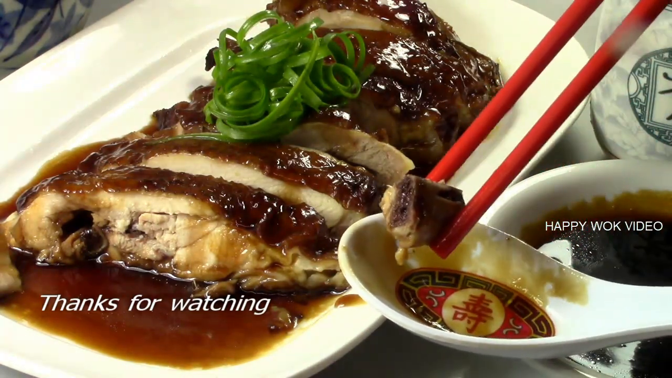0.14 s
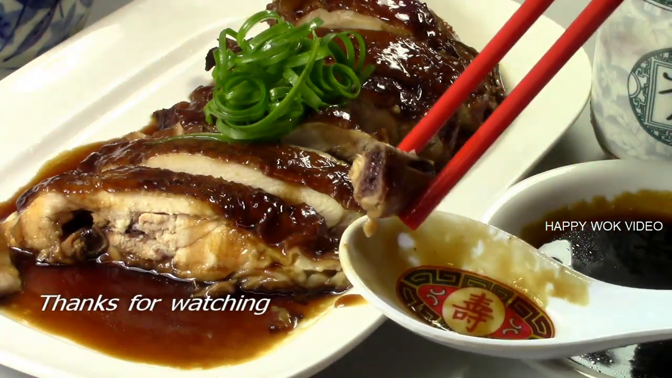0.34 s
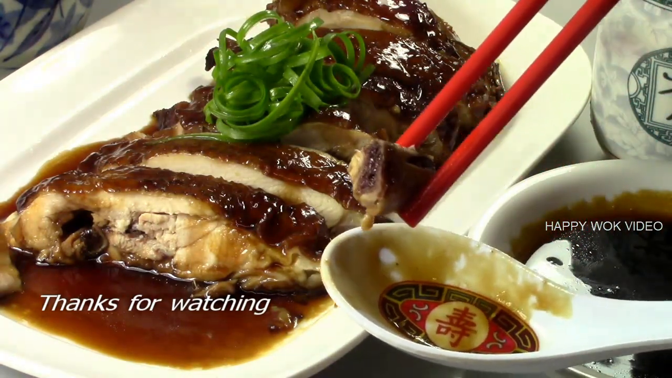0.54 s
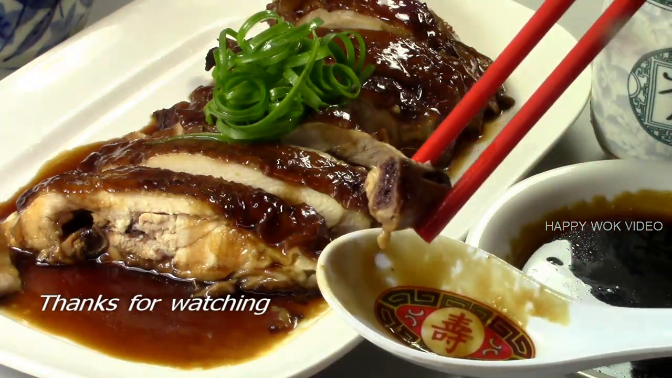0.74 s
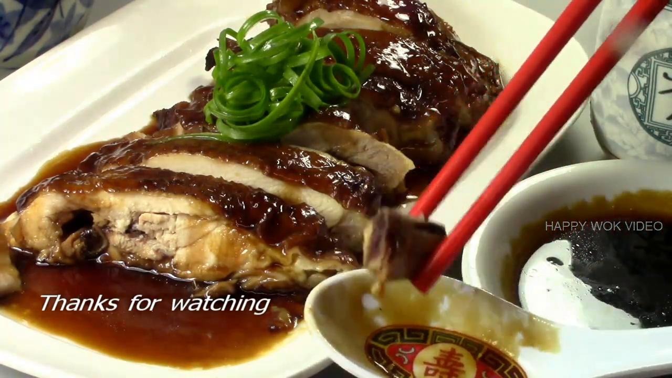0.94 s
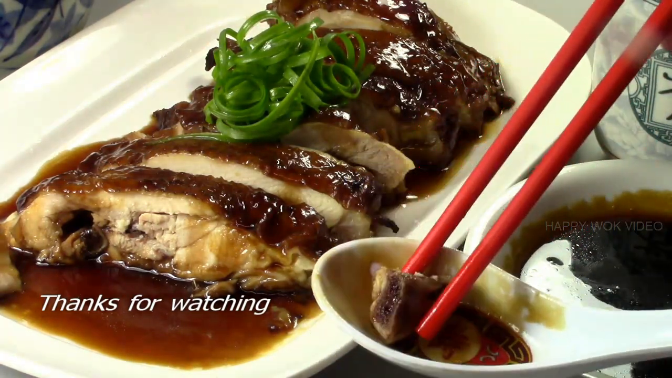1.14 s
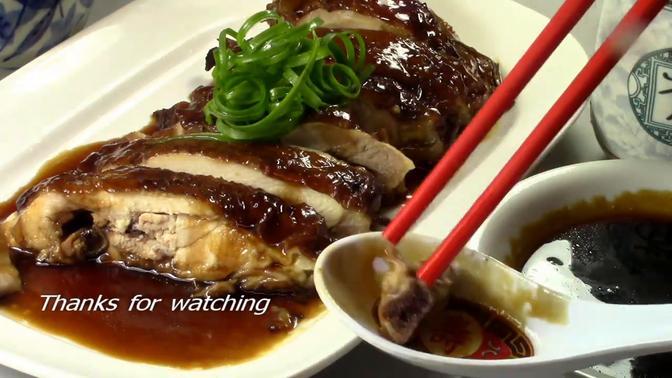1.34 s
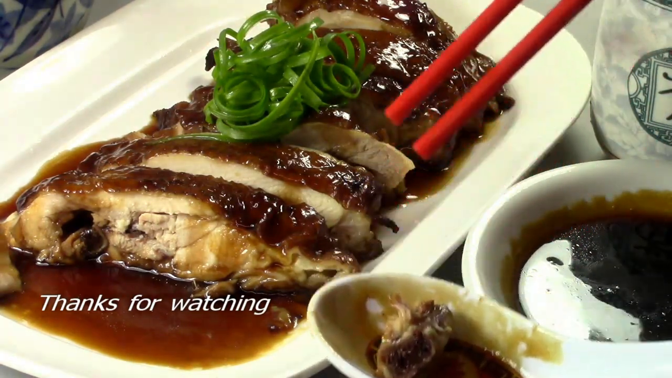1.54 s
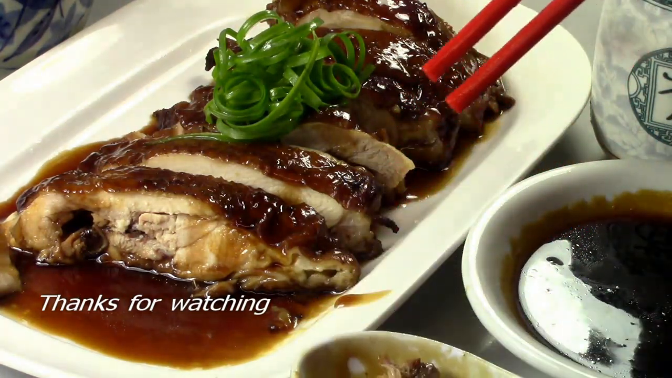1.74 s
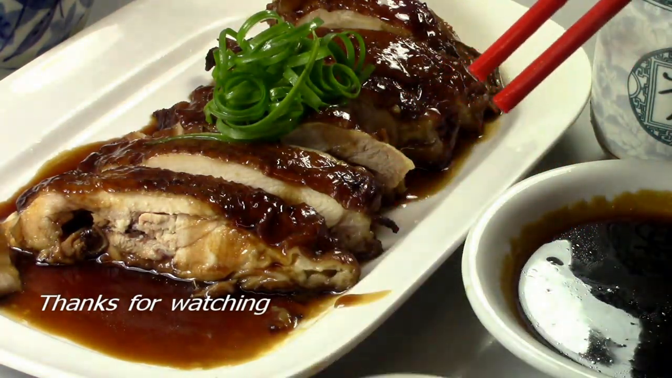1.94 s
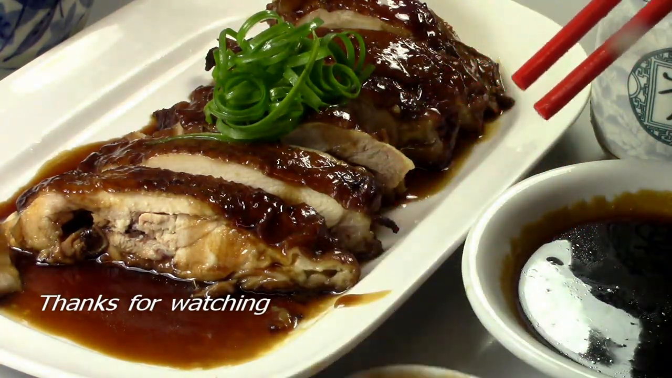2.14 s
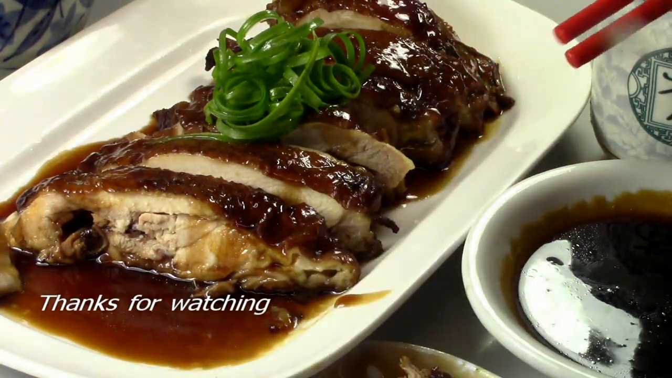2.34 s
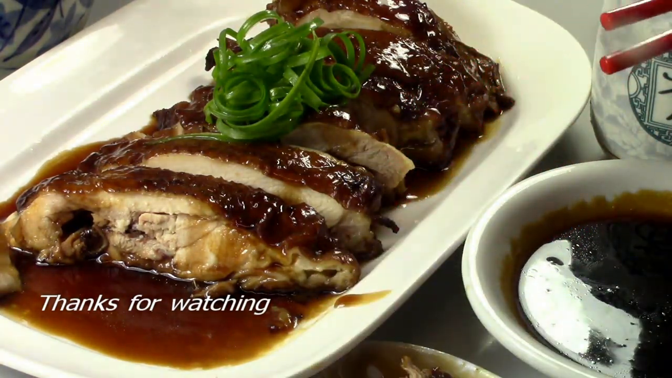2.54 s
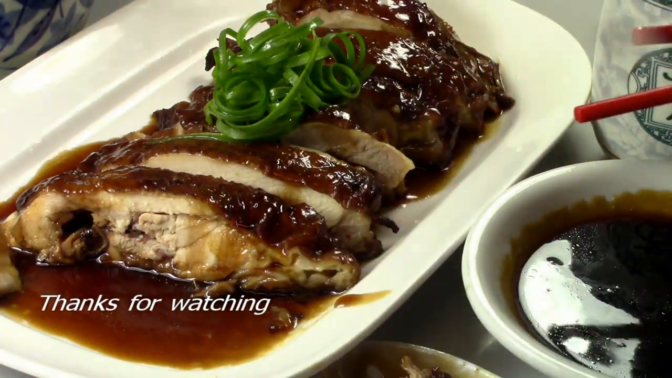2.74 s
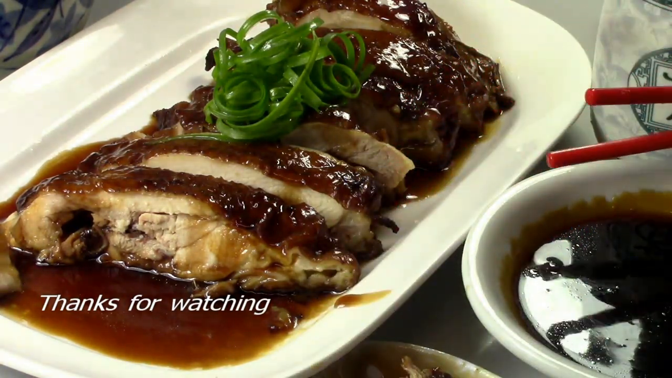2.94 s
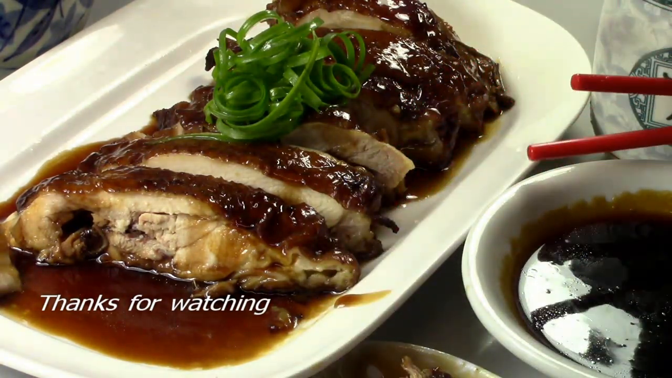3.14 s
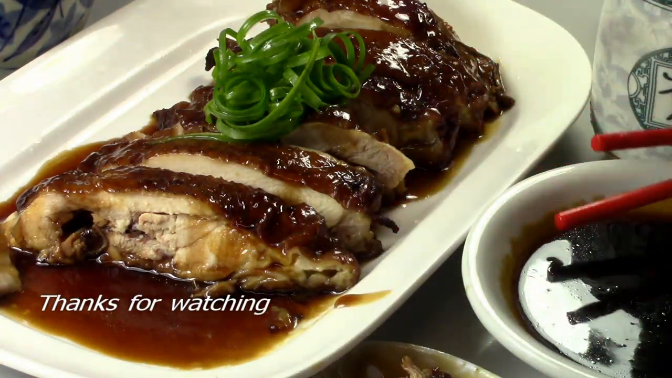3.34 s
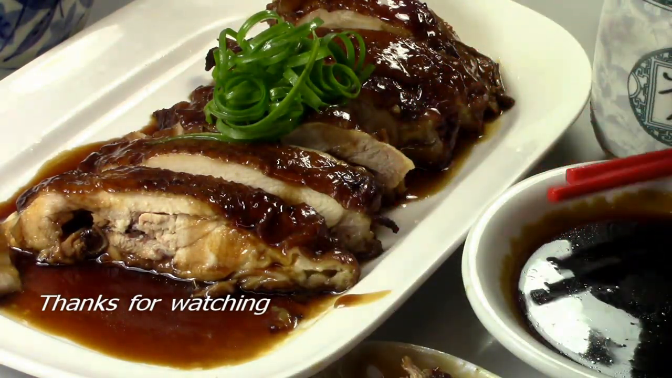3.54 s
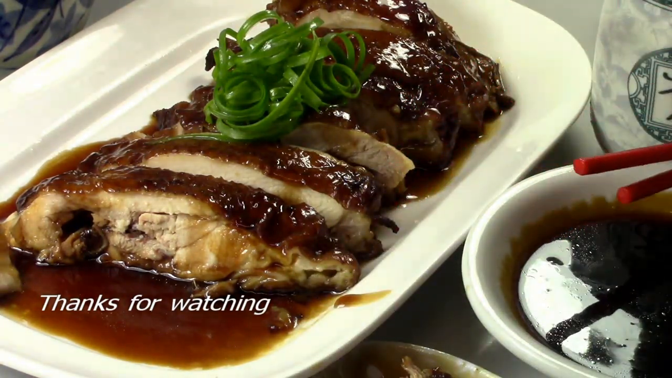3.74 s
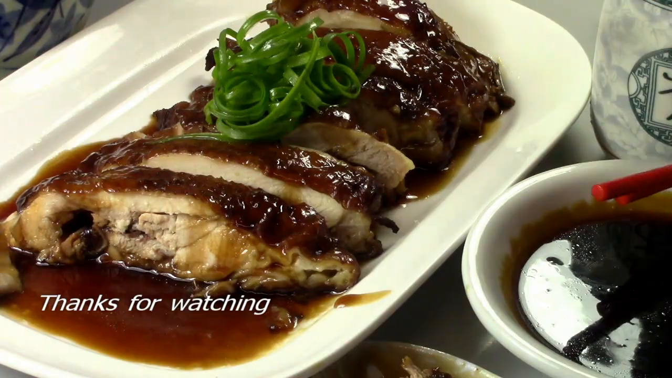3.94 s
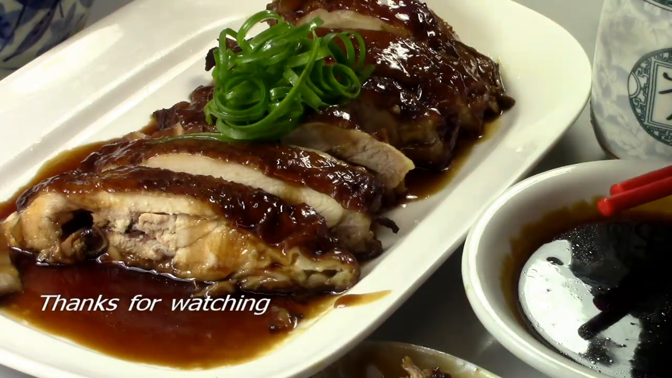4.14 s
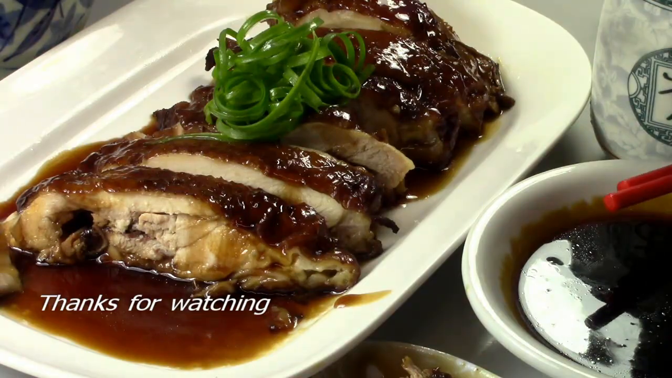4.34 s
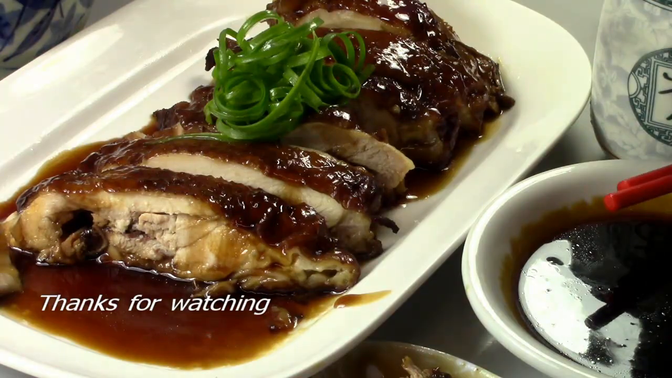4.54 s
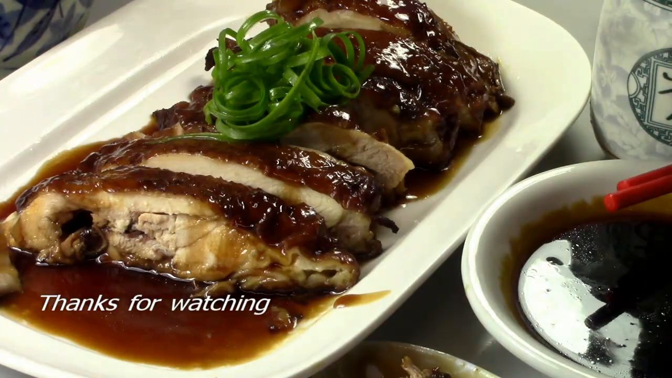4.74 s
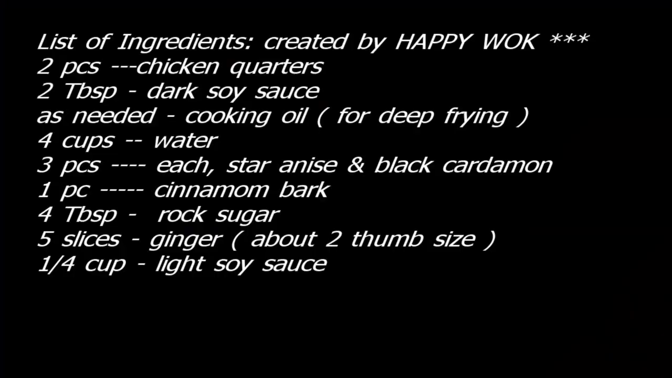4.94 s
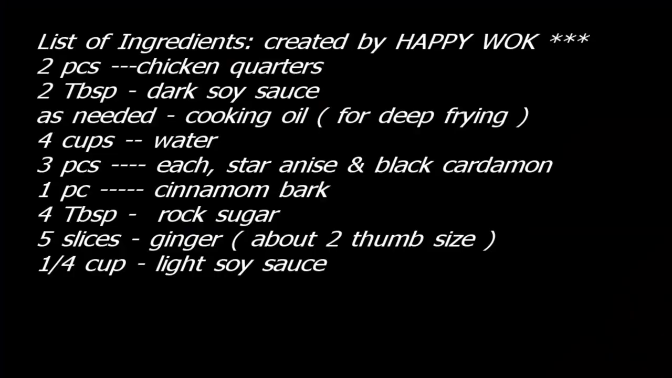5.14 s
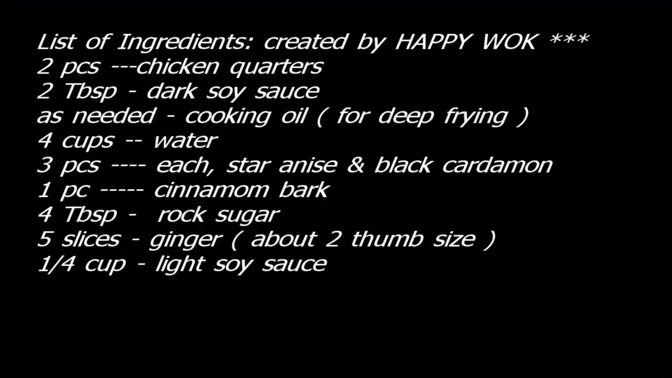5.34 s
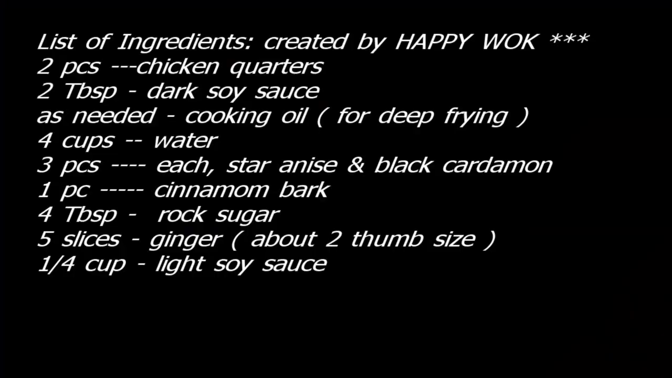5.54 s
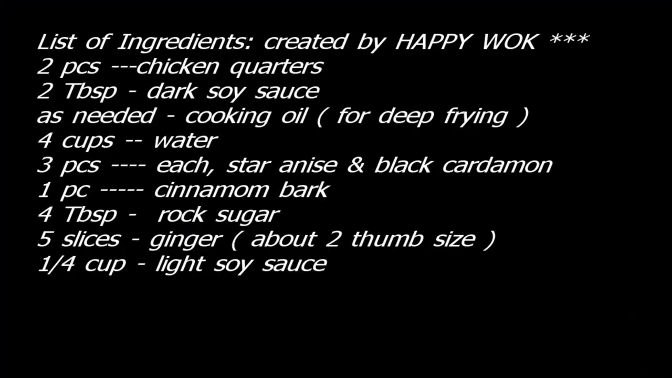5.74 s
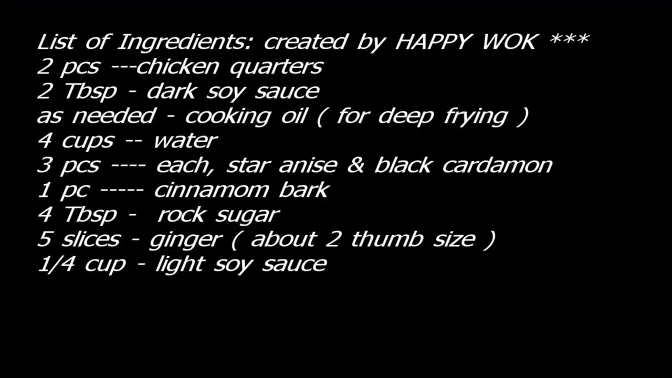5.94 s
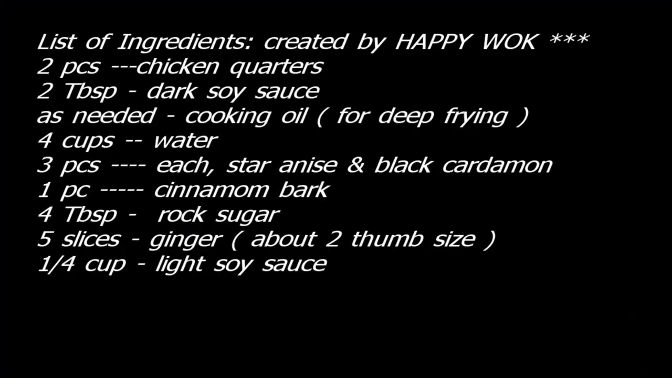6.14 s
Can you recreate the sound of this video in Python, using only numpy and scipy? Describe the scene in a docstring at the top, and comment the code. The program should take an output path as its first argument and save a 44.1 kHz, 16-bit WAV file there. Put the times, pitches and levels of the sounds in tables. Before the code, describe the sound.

Quiet small room with low, dull background noise, close stereo microphone. A china spoon slides faintly over the table in short scuffs, followed by a bright clack and a solid dull knock as it is set down. More knocks follow, then a quick cluster of ringing china rattles and tiny scrapes, another tight clatter, a dry rub right at the microphone, and an abrupt cut to near silence.

```python
"""Chopsticks, china and a sliding spoon

Chopsticks pick food off a platter in a small, quiet room; a china spoon slides over the table and is set down.
Clacks, touches on a sauce bowl and rattles on the spoon are noise bursts that knock through the table,
with decaying sines for the ring. Streams of tiny clicks make the slides, scrapes and a faint breath-like hiss.
Something rubs close to the microphone over faint filtered room noise, then the input is switched off."""
import sys
import numpy as np
from scipy import signal
from scipy.fft import rfft, irfft, next_fast_len
from scipy.io import wavfile
from scipy.ndimage import map_coordinates

SR = 44100
rng = np.random.default_rng(int(sys.argv[2]) if len(sys.argv) > 2 else 0)


def output_pcm(signal):
    """Save a mono or channel-first signal as 16-bit PCM at the path in sys.argv[1].

    Samples are clipped to [-1, 1] before scaling.
    """
    pcm = np.clip(np.atleast_2d(signal).T, -1, 1) * 32767
    wavfile.write(sys.argv[1], SR, np.round(pcm).astype(np.int16))


N = 276933
TIME = np.arange(N) / SR  # s

# contacts on the china spoon: start_s [s], relative knock_db [dB], hardness [treble slope, dB/octave],
# relative ring_db [dB]
SPOON_CONTACTS = [(1.5205, 11, -12, -33.5), (2.3392, 9, -4, -30), (3.4915, 11, 0.5, -18),
                  (3.6755, 13.5, 0.5, -4.5), (3.7598, 10, -1.5, -8), (3.8238, 15.5, 0.5, -9),
                  (3.832, 3, -0.5, -29), (3.845, 8, -1.5, -10.5), (4.208, -2, -6, -37),
                  (4.2197, 17, 1.2, -5.5), (4.2353, 13.5, -2, -7), (4.2492, 15, -3, -19)]
# contacts on the sauce bowl: start_s [s], relative knock_db [dB], hardness [dB/octave], relative ring_db [dB]
BOWL_CONTACTS = [(3.1705, 2, -1.5, -23.5), (3.622, 0, 2.5, -29), (3.6295, 2, 0.5, -21.5),
                 (3.708, 7.5, -2, -25.5), (3.799, 5, 0.5, -33.5), (4.376, -40, -4, -47),
                 (4.411, -13, -2, -54)]
# short bright clacks, the two loud ones likely a touch on the platter, the faint ones sticks:
# start_s [s], relative knock_db [dB], hardness [dB/octave], relative ring_db [dB]
CLACKS = [(1.8405, 10.5, -3, -16), (2.027, -9.5, -6.5, -43.5), (2.04, -17, -3, -44), (2.4485, 9, -5, -15.5),
          (2.8505, -10.5, 3.5, -41), (2.8585, -19, 5, -60)]
# damped knocks without ring, the loudest perhaps the spoon set down on the table:
# start_s [s], relative knock_db [dB], hardness [dB/octave]
DULL_KNOCKS = [(2.1968, 19.5, -5), (2.465, 12, -24), (3.729, 6.5, 2)]
# small dry ticks of the chopstick tips: start_s [s], relative knock_db [dB], hardness [dB/octave]
TIP_TICKS = [(1.2385, -11.5, 0.5), (3.07, -34.5, 8.5)]

# colour of each kind of knock: pitch_hz [Hz], level_db [dB]
SPOON_KNOCK_COLOUR = [(400, 0), (1400, -2.5), (3400, 0.5), (6300, -0.5), (9600, -9.5)]
BOWL_KNOCK_COLOUR = [(400, 3.5), (1400, -13), (3400, -1.5), (6300, 5), (9600, -5.5)]
CLACK_COLOUR = [(400, -1.5), (1400, -6), (3400, -13.5), (6300, 1), (9600, -7.5)]
DULL_KNOCK_COLOUR = [(400, -6.5), (1400, -1.5), (3400, 6.5), (6300, -5), (9600, -2.5)]
TIP_KNOCK_COLOUR = [(400, -8), (1400, 1), (3400, 2), (6300, 7.5), (9600, -8)]
# a sharp contact carries little bass: pitch_hz [Hz], level_db [dB]
CONTACT_BASS_LOSS = [(40, -17), (110, -10.5), (230, -3.5), (390, 2.5), (700, -3), (1300, 0), (11000, -2)]
# the treble slope of a contact runs between these two pitches; the second is also the top of the sound
SOFTEN_ABOVE_HZ, CUTOFF_HZ = 1580, 10950

# resonances of the table with the dishes on it: pitch_hz [Hz], width_hz [Hz], level_db [dB]
TABLE_RESONANCES = [(400, 24, -2), (447, 20, -10), (974, 13, -14), (1253, 140, -4), (1515, 280, -4.5),
                    (1800, 13, -7.5), (2250, 68, 2)]
# ringing modes of the spoon, the bowl and the clacks: pitch_hz [Hz], level_db [dB], t60_s [s]
SPOON_MODES = [(2240, -24, 0.18), (4280, -16.5, 0.073), (4797, -13, 0.14), (4840, -6.5, 0.15),
               (4866, -1.5, 0.04), (5082, -18.5, 0.2), (6180, -12, .07), (7734, -6.5, .06),
               (8160, -3.5, 0.079), (8224, -2, .04), (9120, -8, 0.021), (10385, -25, .07)]
BOWL_MODES = [(3284, -6, 0.31), (3290, -0.5, .09), (5253, -16.5, .08), (6100, -23.5, .25), (8656, -8, .28),
              (9210, 7, 0.033), (10400, -15, 0.081)]
CLACK_MODES = [(2814, -3.5, 0.061), (2920, -0.5, 0.031), (2950, -20, 0.07), (3573, -7, 0.083),
               (5885, -7.5, 0.031), (7450, 2.5, 0.025), (8600, -7, 0.044), (9520, -6.5, 0.034)]

# pushes that slide the spoon over the table; the one at 3.986 is a brighter scuff of a tip:
# start_s at full grip [s], length_s [s], level_db [dB], spoon ring relative to the push, ring_db [dB]
SPOON_SLIDES = [(0.492, 0.04, -44.5, -18), (0.571, 0.082, -43, -18), (0.743, 0.027, -57, -21),
                (0.857, .075, -47.5, -18.5), (0.952, 0.049, -53, -9.5), (1.184, 0.016, -56, -12.5),
                (3.986, 0.056, -50.5, 0.5), (4.194, 0.037, -45.5, -16.5)]
# chopstick tips drag on china between contacts: start_s at full grip [s], length_s [s], level_db [dB],
# bowl ring relative to the drag, ring_db [dB]
TIP_SCRAPES = [(2.285, 0.037, -50.5, -28), (3.623, 0.0074, -30, -3), (3.717, 0.08, -36.5, 0),
               (3.831, 0.023, -25.5, -12)]
# colour of the dragging tips: pitch_hz [Hz], level_db [dB]
TIP_SCRAPE_COLOUR = [(200, -0.5), (1500, 4), (3000, 0), (5000, -3.5), (7000, 1), (9400, 4.5), (10500, -17),
                     (13000, -22)]
# faint breath-like hisses: start_s at full swell [s], length_s [s], level_db [dB]
BREATHY_HISSES = [(0.059, 0.2, -62), (3.442, .14, -53)]
# resonances of the hiss before they sink: pitch_hz [Hz], width_hz [Hz], level_db [dB]
HISS_RESONANCES = [(3000, 97, 4), (3824, 120, -7), (5430, 600, 0), (7100, 700, -8), (9270, 500, -12.5)]
HISS_SAG_OCTAVES_PER_S = 0.4
# pushes of a dry rub close to the microphone: start_s at full grip [s], length_s [s], level_db [dB]
CLOSE_RUBS = [(4.807, 0.012, -39), (4.823, 0.0071, -28.5), (4.851, 0.017, -21), (4.882, 0.022, -28),
              (4.986, .008, -41.5)]
# colour of the close rub: pitch_hz [Hz], level_db [dB]
CLOSE_RUB_COLOUR = [(25, -5), (60, -19), (100, -13), (464, -11), (576, -10), (905, -10), (1570, -4.5),
                    (1990, 1), (2670, 1), (6220, 0.5), (11000, -9.5), (14300, -56.5), (22000, -120)]

# decay time of the room: pitch_hz [Hz], t60_s [s]
ROOM_DECAY = [(150, 0.65), (400, 0.27), (1000, 0.32), (3000, 0.27), (8000, 0.32), (12000, 0.14)]
# how differently the direct sound reaches the two microphones: pitch_hz [Hz], side_db [dB]
DIRECT_SIDE = [(100, -8), (1000, -9.5), (3000, 2.5), (10000, 2.5)]
# colour of the room noise: pitch_hz [Hz], level_db [dB]
AIR_COLOUR = [(18, -35.5), (30, -14), (48, -22), (96, -8.5), (245, -0.5), (373, -5.5), (501, -3.5),
              (1490, -13.5), (2380, -14), (3990, -19.5), (5650, -20), (6550, -24), (9480, -24.5),
              (11000, -35), (14300, -58), (22000, -120)]
# width of the room noise: pitch_hz [Hz], side relative to mid, side_db [dB]
AIR_SIDE = [(50, -19), (200, -9), (1000, -8), (3000, -16.5), (9000, -25.5)]
AIR_DB = -57.5
SWITCH_OFF_S = 5.187


def knocks(hits, spectrum, crack_t60, body_t60, body_db):
    """A contact is a sharp crack and a short dense shudder of dish and table, brighter the harder it is."""
    out = np.zeros(N)
    size = SR // 8
    for start_s, knock_db, hardness, *_ in hits:
        crack = burst(crack_t60, size)
        body = from_db(body_db) * burst(body_t60, size)
        treble_db = hardness * np.log2(CUTOFF_HZ / SOFTEN_ABOVE_HZ)
        treble = [(SOFTEN_ABOVE_HZ, 0), (CUTOFF_HZ, treble_db)]
        start = round(start_s * SR)
        blow = colour(crack + body, spectrum, treble, CONTACT_BASS_LOSS)
        out[start:start + size] += from_db(knock_db) * blow
    return from_db(-6) * (out + from_db(-3.0) * on_table(out))


def ringing(hits, modes, main_hz, hardness_effect, gain_db):
    """Contacts excite the object's modes; the harder the contact, the stronger those above the main one."""
    start_s, _, hardness, ring_db = np.transpose(hits)
    starts = np.round(start_s * SR).astype(int)
    out = np.zeros(N)
    for hz, mode_db, t60 in modes:
        octaves_up = max(np.log2(hz / main_hz), 0)
        uneven_db = rng.standard_normal(len(starts))  # no two contacts strike a mode alike
        strength_db = ring_db + hardness_effect * hardness * octaves_up + uneven_db
        clicks = np.zeros(N)
        clicks[starts] = from_db(strength_db + mode_db)
        out += ring(clicks, hz, t60)
    return from_db(gain_db) * out


def spoon_slide(grit_db):
    """Fine stick-slip sounds the table and keeps the spoon faintly ringing."""
    start_s, length_s, level_db, ring_db = np.transpose(SPOON_SLIDES)
    shape = dict(attack_s=0.016, swell_db=5.5, release_s=0.01)
    foot = strokes(zip(start_s, length_s, level_db), **shape)
    rim = strokes(zip(start_s, length_s, level_db + ring_db), **shape)
    grains = rms_one(slips(per_s=3800, spread_db=0.5))
    friction = foot * grains
    on_rim = rim * grains
    table_colour = [(200, 3.0), (500, 9.5), (1400, 0), (2400, -7.5), (4000, -8)]  # Hz, dB
    table = rms_one(colour(on_table(friction), table_colour))
    return np.std(friction) * table + on_china(on_rim, SPOON_MODES) + from_db(grit_db) * on_rim


def tip_scrape():
    """Hard tips chatter over the glaze with a bright grit and keep the bowl ringing."""
    start_s, length_s, level_db, ring_db = np.transpose(TIP_SCRAPES)
    shape = dict(attack_s=0.0045, swell_db=0.5, release_s=0.0098)
    tip = strokes(zip(start_s, length_s, level_db), **shape)
    rim = strokes(zip(start_s, length_s, level_db + ring_db), **shape)
    grit = rms_one(colour(slips(per_s=3000, spread_db=-1.5), TIP_SCRAPE_COLOUR))
    return tip * grit + on_china(rim * grit, BOWL_MODES)


def breathy_hiss():
    """A soft hiss, dense random clicks through resonances that sink in pitch."""
    grains = slips(per_s=12000, spread_db=3.5)
    hiss = sum(from_db(db) * resonance(grains, hz, width) for hz, width, db in HISS_RESONANCES)
    hiss = rms_one(hiss)
    out = np.zeros(N)
    for start_s, length_s, level_db in BREATHY_HISSES:
        rate = 2 ** (-HISS_SAG_OCTAVES_PER_S * np.maximum(TIME - start_s, 0))
        sagging = map_coordinates(hiss, [np.cumsum(rate)], order=3)  # read ever more slowly
        swell = stroke(start_s, length_s, attack_s=0.2, swell_db=0.3, release_s=0.09)
        out += from_db(level_db) * swell * sagging
    return out


def close_rub():
    """A short, dry, grainy rub made of dense uneven friction clicks."""
    pressure = strokes(CLOSE_RUBS, attack_s=0.017, swell_db=-0.8, release_s=0.014)
    return pressure * rms_one(colour(slips(per_s=6000, spread_db=4), CLOSE_RUB_COLOUR))


def room_noise():
    """Steady dull background of filtered noise, nearly the same in both channels."""
    mid, side = rms_one(colour(rng.standard_normal((2, N)), AIR_COLOUR))
    side = colour(side, AIR_SIDE)
    return from_db(AIR_DB) * (mid + np.array([side, -side]))


def room(x, wet_db, echo_s, echo_db, side_db, spread_db):
    """Direct sound, slightly unlike in the two microphones, one near wall and a diffuse, nearly mono tail."""
    size = SR // 2
    edges = np.geomspace(60, 15000, 9)  # Hz, eight bands that decay at their own rates
    tail = np.zeros((2, size))
    for low, high in zip(edges, edges[1:]):
        t60 = at_hz(ROOM_DECAY, np.sqrt(low * high))
        band = signal.butter(2, [low, high], "band", fs=SR, output="sos")
        tail += signal.sosfilt(band, [burst(t60, size), burst(t60, size)])
    tail *= from_db(wet_db) * (1 - np.exp(-TIME[:size] / 0.0025))  # the tail builds up over a few ms
    mid, side = signal.fftconvolve(x[None], tail, axes=1)[:, :N]
    echo = from_db(echo_db) * np.interp(TIME - echo_s, TIME, x, left=0)
    spread = signal.fftconvolve(x, colour(burst(0.015, size), DIRECT_SIDE))[:N]
    side = from_db(side_db) * side + from_db(spread_db) * spread
    return x + echo + mid + np.array([side, -side])


def pan(x, right_db):
    """Tilt a stereo pair to the right by a level difference between the channels."""
    return x * from_db([[-right_db / 2], [right_db / 2]])


def on_table(x):
    """What the table's resonances make of a force."""
    return sum(from_db(db) * resonance(x, hz, width) for hz, width, db in TABLE_RESONANCES)


def on_china(x, modes):
    """What a dish's modes make of a force, at the same rms."""
    return np.std(x) * rms_one(sum(from_db(db) * ring(x, hz, t60) for hz, db, t60 in modes))


def stroke(start_s, length_s, attack_s, swell_db, release_s):
    """Gain of one push: it rises just before start_s, changes by swell_db and dies away after length_s."""
    t = TIME - start_s
    rise = np.clip(1 + t / attack_s, 0, 1) ** 2
    swell = from_db(swell_db * (np.clip(t / length_s, 0, 1) - 1.0))
    release = np.exp(-np.maximum(t - length_s, 0) / release_s)
    return rise * swell * release


def strokes(rows, attack_s, swell_db, release_s):
    """Gain over time of a run of pushes of one shape; the strongest push prevails."""
    gains = [from_db(db) * stroke(s, length, attack_s, swell_db, release_s) for s, length, db in rows]
    return np.max(gains, axis=0)


def slips(per_s, spread_db):
    """A stream of tiny clicks of uneven size and random sign, as in friction."""
    sizes = from_db(spread_db * np.minimum(rng.exponential(1, N), 4))
    signs = rng.choice([-1, 1], N)
    return sizes * signs * (rng.random(N) < per_s / SR)


def burst(t60, size):
    """Noise of unit energy that dies away by 60 dB in t60 seconds."""
    x = rng.standard_normal(size) * from_db(-60 * TIME[:size] / t60)
    return x / np.linalg.norm(x)


def ring(clicks, hz, t60):
    """A two-pole resonator: a unit click sets a decaying sine of height 1 ringing."""
    r = np.exp(-np.log(1000) / (t60 * SR))
    w = 2 * np.pi * hz / SR
    return signal.lfilter([0, np.sin(w)], [1, -2 * r * np.cos(w), r * r], clicks + 1e-18)


def resonance(x, hz, width):
    """Two-pole band-pass with gain 1 on top; width in Hz."""
    r = np.exp(-np.pi * width / SR)
    w = 2 * np.pi * hz / SR
    return signal.lfilter(np.array([1, 0, -1]) * (1 - r * r) / 2, [1, -2 * r * np.cos(w), r * r], x)


def colour(x, *spectra):
    """Causal (minimum-phase) filter whose gain is the sum of the (Hz, dB) spectra."""
    size = 2 * next_fast_len(x.shape[-1])
    hz = np.fft.rfftfreq(size, 1 / SR)
    gain = from_db(sum(at_hz(s, hz) for s in spectra))
    cepstrum = irfft(np.log(gain))
    # folding the cepstrum onto positive time gives minimum phase
    cepstrum[1:size // 2] *= 2
    cepstrum[size // 2 + 1:] = 0
    return irfft(rfft(x, size) * np.exp(rfft(cepstrum)))[..., :x.shape[-1]]


def at_hz(points, hz):
    """Read a table along a log-frequency axis."""
    known_hz, values = np.transpose(points)
    return np.interp(np.log(np.maximum(hz, 1)), np.log(known_hz), values)


def from_db(db):
    """Decibels to gain."""
    return 10 ** (np.asarray(db) / 20)


def rms_one(x):
    """Scale to unit rms."""
    return x / np.sqrt(np.mean(x ** 2) + 1e-20)


def scene():
    """Knocks, friction, hiss and china lean very slightly right; the close rub and tip ticks stay central."""
    thuds = (knocks(SPOON_CONTACTS, SPOON_KNOCK_COLOUR, crack_t60=0.023, body_t60=0.083, body_db=-0.5)
             + knocks(BOWL_CONTACTS, BOWL_KNOCK_COLOUR, crack_t60=0.034, body_t60=0.092, body_db=2.0)
             + knocks(CLACKS, CLACK_COLOUR, crack_t60=0.01, body_t60=0.056, body_db=0.5)
             + knocks(DULL_KNOCKS, DULL_KNOCK_COLOUR, crack_t60=0.013, body_t60=0.08, body_db=-1.0))
    ticks = knocks(TIP_TICKS, TIP_KNOCK_COLOUR, crack_t60=0.0019, body_t60=0.031, body_db=-3)
    clack_ring = ringing(CLACKS, CLACK_MODES, main_hz=2800, hardness_effect=2.87, gain_db=-3.5)
    china = (ringing(SPOON_CONTACTS, SPOON_MODES, main_hz=4760, hardness_effect=2.3, gain_db=-6)
             + ringing(BOWL_CONTACTS, BOWL_MODES, main_hz=3290, hardness_effect=1.6, gain_db=-2.5))
    sustained = spoon_slide(grit_db=-1.0) + tip_scrape() + breathy_hiss()

    centre = room(thuds + clack_ring + sustained, wet_db=-6.5, echo_s=0.0083, echo_db=-13.0,
                  side_db=-27.5, spread_db=-25.5)
    china_in_room = room(china, wet_db=-6.5, echo_s=0.009, echo_db=-20.0, side_db=-16.5, spread_db=-19)
    near = room(close_rub() + ticks, wet_db=-6, echo_s=0.01, echo_db=-36.0, side_db=-31, spread_db=-28)
    return pan(centre, right_db=0.6) + pan(china_in_room, right_db=0.64) + near + room_noise()


def record(dry):
    """Peaks are rounded; switch-off leaves a faint pop, a steady offset and a trace of sound; the top is cut."""
    rounded = 0.9 * np.tanh(dry / 0.9)
    switched_off = 0.0079 + from_db(-42.0) * dry
    live = np.where(TIME < SWITCH_OFF_S, rounded, switched_off)
    low_pass = signal.cheby1(14, 0.2, CUTOFF_HZ, fs=SR, output="sos")
    return signal.sosfilt(low_pass, live)


dry = scene()
out = record(dry)
output_pcm(out)
```